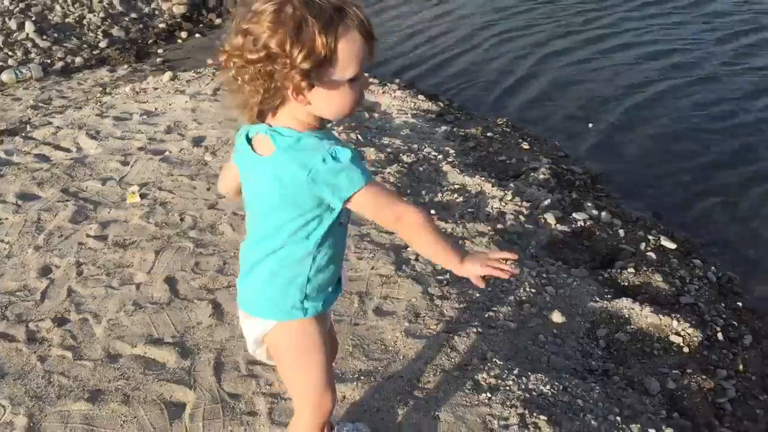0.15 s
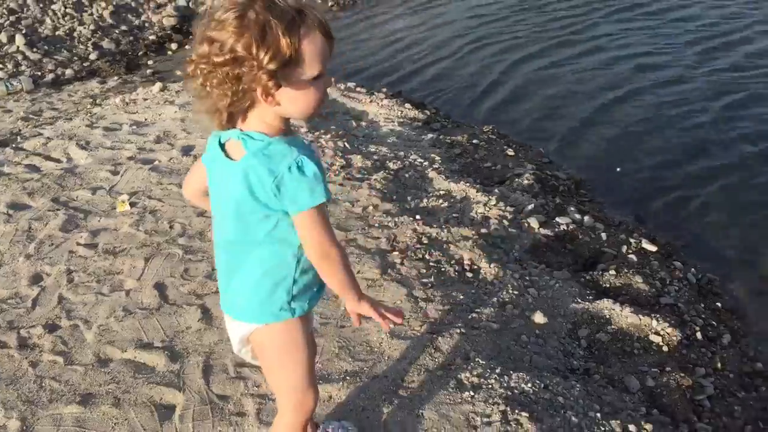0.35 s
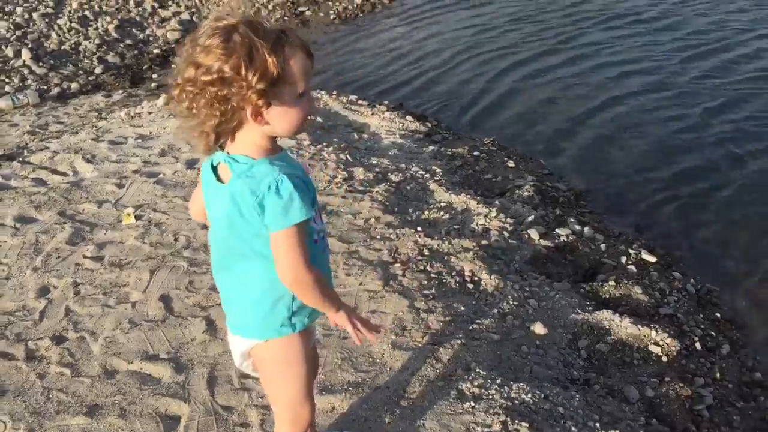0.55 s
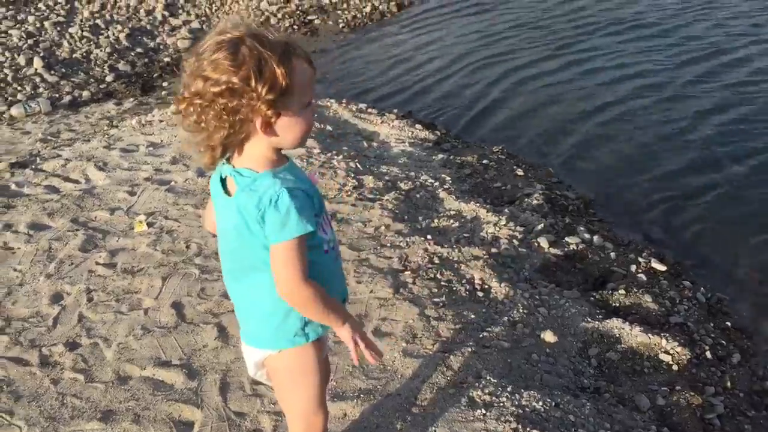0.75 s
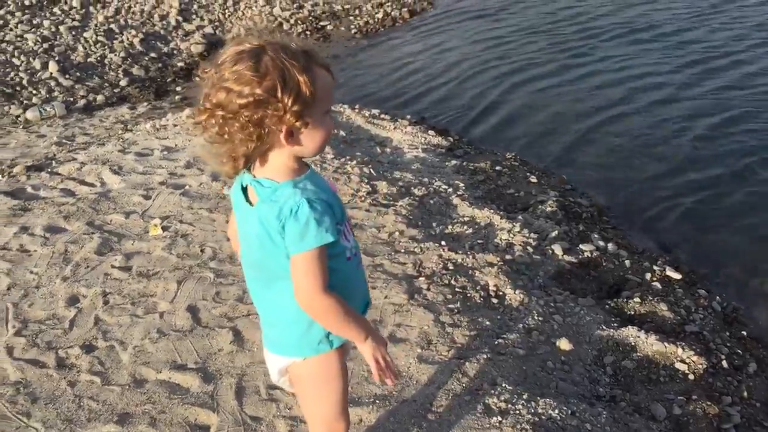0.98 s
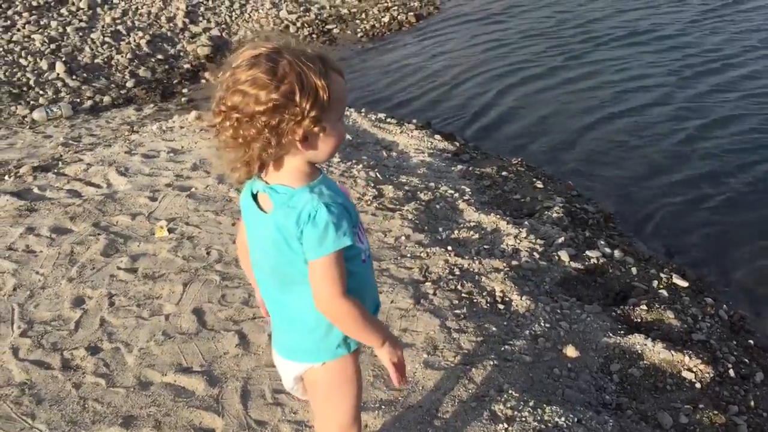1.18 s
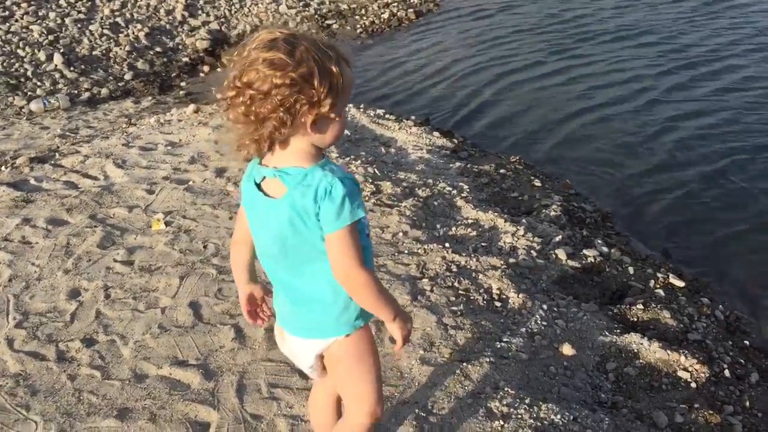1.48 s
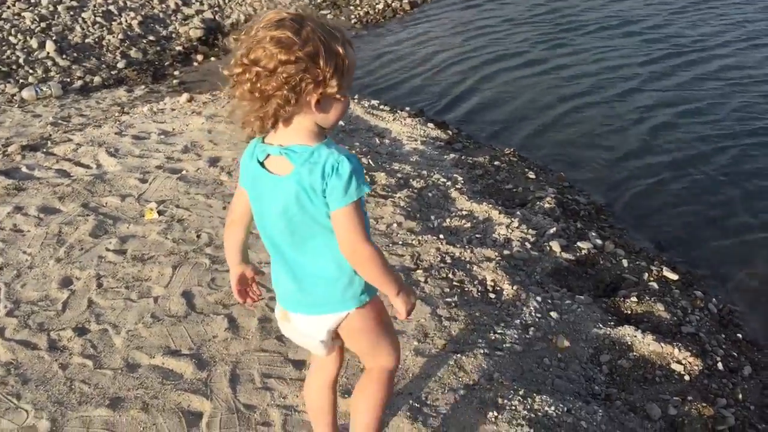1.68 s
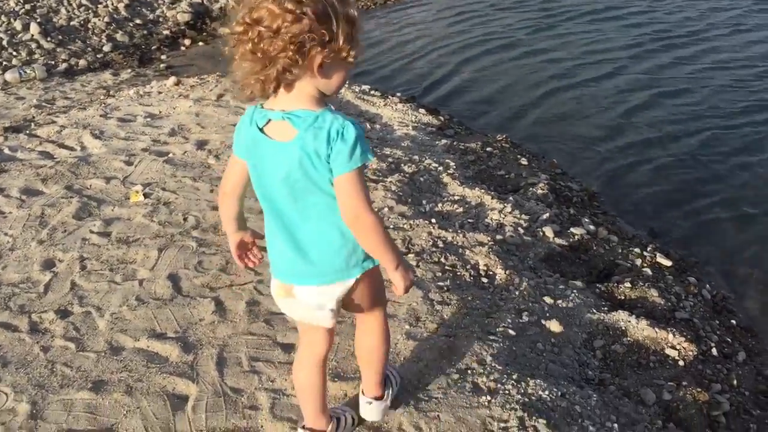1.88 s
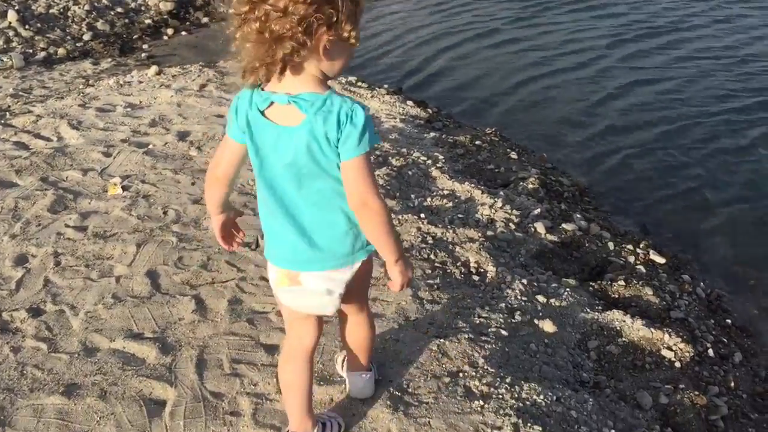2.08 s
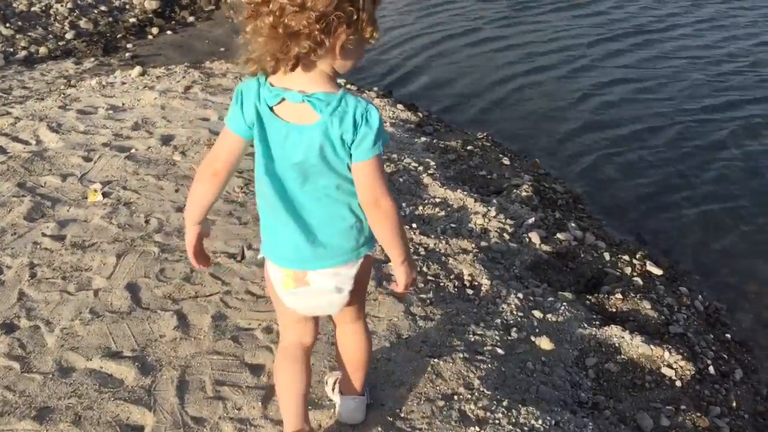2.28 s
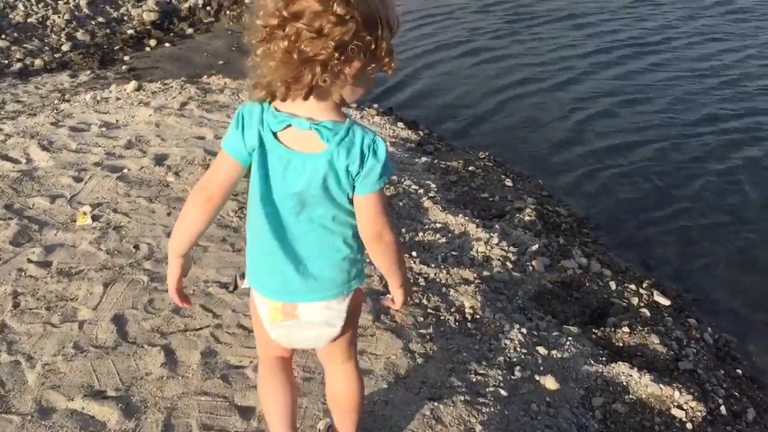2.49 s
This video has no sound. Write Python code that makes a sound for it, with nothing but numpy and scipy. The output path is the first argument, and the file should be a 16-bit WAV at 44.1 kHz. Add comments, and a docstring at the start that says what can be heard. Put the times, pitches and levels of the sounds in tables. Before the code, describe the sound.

Wind buffeting right at a handheld phone microphone: dense heavy thumps first, a brief calmer gap with faint clicks and plips, another uneven cluster of gusts, then weaker puffs over soft lapping water outdoors.

```python
"""Gusty wind is heard first, right at a phone's microphone on a pebbly shore: a wandering low rumble, with
eddies that burst over the port as a thud and a quicker flutter, all shaped noise, and short bright slaps among
them. Behind the wind water washes softly in flickering bands of noise, with a thin wavering sine whine, and a
fine steady hiss lies under everything. Grit ticks and sand slides are bursts and grains of noise; a pebble
knock and water plips are ringing partials. A brief low hoot is a rising sine. The microphone cuts deep bass and
top and rounds the loudest buffets."""
import sys
import numpy as np
from scipy import signal
from scipy.fft import rfft, irfft
from scipy.io import wavfile
from scipy.ndimage import uniform_filter1d

SR = 44100
rng = np.random.default_rng(int(sys.argv[2]) if len(sys.argv) > 2 else 0)


def digitize_waveform(pressure):
    """Quantize a signal to 16-bit integers and store it at the path in sys.argv[1].

    Rows of a 2-D input are taken as channels; values are limited to [-1, 1].
    """
    field = np.atleast_2d(pressure).T
    bounded = np.clip(field, -1, 1)
    quanta = np.round(bounded * 32767).astype(np.int16)
    wavfile.write(sys.argv[1], SR, quanta)


N = 116865

# All levels are those ahead of the microphone's own filters and rounding.
# Low wind rumble between the eddies. Each row: time in seconds, level in dB before RUMBLE_LIFT_DB is added.
RUMBLE_LEVELS = [(0.0, -32.5), (0.21, -25), (0.36, -34), (0.57, -23), (0.74, -34.5), (1.04, -36),
                 (1.3, -55.5), (1.62, -36.5), (1.82, -45), (2.04, -51), (2.21, -34.5), (2.65, -44)]
RUMBLE_LIFT_DB, RUMBLE_TOP_HZ, RUMBLE_SLOPE = 4.5, 114, 3.56

# Water and far air behind the wind. Each row: frequency in Hz, relative spectrum level in dB.
WASH_COLOUR = [(200, 11), (700, 2.5), (1500, -1), (2200, -4.5), (3300, -10), (5000, -21), (9000, -31.5),
               (17000, -37)]
WASH_DB = -49.5
WASH_BAND_OCT, WASH_FLICKER_DB, WASH_FLICKER_PER_S = 0.5, 2, 12

# Steady fine hiss. Each row: frequency in Hz, relative spectrum level in dB.
HISS_COLOUR = [(2000, -18.5), (4000, 4), (8000, -9), (17000, -12)]
HISS_DB = -74.5

WHINE_HZ, WHINE_DB = 3396, -67.5  # middle of a slow waver

# Eddies over the microphone port. Each row: centre in seconds, half length in ms (of the flutter; the thud
# is longer by THUD_STRETCH), thud level in dB, flutter level in dB, flutter corner in Hz.
EDDIES = [(0.028, 46, -26.5, -49, 553), (0.049, 7.7, -38, -58, 503), (0.087, 6.1, -34.5, -28.5, 452),
          (0.124, 15, -28, -51, 570), (0.175, 6.5, -26, -18, 300), (0.204, 3.1, -17, -38, 522),
          (0.223, 3.9, -4.5, -25.5, 634), (0.243, 19.8, -6.5, -8.5, 488), (0.281, 14, -35.5, -17, 630),
          (0.32, 26, -14, -24, 500), (0.352, 19.3, -14.5, -28, 500), (0.374, 2.7, -21, -28.5, 450),
          (0.441, 18, -20.5, -33.5, 657), (0.476, 10, -25.5, -19.5, 320), (0.507, 7.1, -18, -16, 369),
          (0.534, 11, -22, -23.5, 600), (0.582, 19, -27.5, -25, 596), (0.611, 29, -20.5, -20.5, 550),
          (0.636, 45, -16.5, -27.5, 494), (0.664, 4.4, -33.5, -14, 546), (0.701, 10.5, -20, -29, 444),
          (0.74, 13.8, -14, -19.5, 598), (0.778, 11, -25, -26.5, 303), (0.866, 9.7, -11, -11, 481),
          (0.892, 12.2, -11.5, -24, 470), (0.918, 12, -45, -63, 400), (0.961, 9.5, -29, -38.5, 460),
          (1.014, 18, -31.5, -41, 398), (1.057, 12.5, -23.5, -36, 353), (1.111, 10.4, -31, -52, 640),
          (1.15, 25, -36, -66, 680), (1.19, 6.2, -35.5, -46, 724), (1.245, 27.4, -25, -33.5, 490),
          (1.286, 10.4, -17, -26, 322), (1.311, 19.8, -16.5, -20, 381), (1.338, 10.5, -11, -16, 512),
          (1.363, 6, -16, -56, 400), (1.412, 33, -35, -52, 525), (1.497, 6.1, -21.5, -32.5, 305),
          (1.572, 9.9, -31, -31, 440), (1.599, 9.2, -15.5, -28.5, 684), (1.623, 41.5, -21.5, -33.5, 556),
          (1.657, 5.5, -27, -33, 450), (1.681, 15.6, -10, -18, 583), (1.7, 9.5, -14, -16.5, 470),
          (1.722, 7.8, -28, -19.5, 440), (1.757, 18, -18.5, -25.5, 666), (1.78, 7, -23.5, -38, 495),
          (1.811, 8.2, -28.5, -44.5, 520), (1.94, 9.9, -35.5, -49.5, 810), (2.002, 9.1, -25.5, -35, 460),
          (2.022, 20, -24.5, -58, 400), (2.058, 7.7, -22, -32, 466), (2.088, 34, -33.5, -60, 400),
          (2.15, 13, -18.5, -27, 505), (2.193, 17.8, -23, -23.5, 278), (2.223, 17, -43, -58.5, 396),
          (2.273, 4.5, -40.5, -33, 404), (2.3, 9.1, -20, -39.5, 400), (2.323, 19, -23, -41.5, 363),
          (2.379, 22.5, -18.5, -28.5, 370), (2.426, 9.1, -35, -34, 294), (2.475, 8.8, -27.5, -66, 430),
          (2.549, 15, -26.5, -32, 466), (2.59, 35, -51, -68, 400)]
THUD_LOW_HZ, THUD_TOP_HZ, THUD_SLOPE, THUD_STRETCH = 53.7, 189, 3.6, 1.153
FLUTTER_LOW_HZ, FLUTTER_SLOPE, FLUTTER_ROUGH_DB = 194, 2.85, 4
BURST_SIZE = 8192  # samples; the swell peaks halfway
SKIRT = 2.15  # envelope exp(-|t / half|^SKIRT)
EVEN, EVEN_S = 0.66, 0.01  # how far a burst's noise is evened out, and over what time

# Sand slides. Each row: centre in seconds, half length in ms, level in dB before the grains modulate it.
SLIDES = [(0.049, 17, -47.5), (.072, 14.4, -51), (.11, 27, -64), (.18, 18, -66), (.73, 8, -74.5),
          (.802, 4.7, -55), (.835, 23, -66.5), (1.15, 17, -54.5), (1.185, 15, -58.5), (1.225, 8, -55.5),
          (1.495, 11, -63), (1.79, 25, -68), (2.35, 14, -65), (2.446, 14, -59)]
# Colour of sliding sand. Each row: frequency in Hz, relative spectrum level in dB.
SAND_COLOUR = [(800, -15), (1500, -2.5), (2400, 0), (3400, -9), (6750, -9), (9000, -10.5), (17000, -28)]
SAND_GRAINS_PER_S, SAND_GRAIN_S = 860, 0.0023

# Grit ticks. Each row: time in seconds (onset 0.6 ms earlier), level in dB before the decay, centre in Hz.
TICKS = [(0.1049, -55, 6550), (0.133, -52.5, 6300), (0.1965, -56, 5900), (0.796, -44.5, 7500),
         (1.141, -49, 8700), (1.1473, -45, 9400), (1.1572, -68, 8300), (1.1779, -65, 7300),
         (1.1857, -63, 5700), (1.1978, -55, 8000), (1.2073, -49, 4700), (1.224, -42, 13600),
         (1.384, -58, 8130), (1.3957, -65, 6100), (1.4328, -65, 5800), (1.4902, -71, 7400),
         (1.502, -56, 7000), (1.8013, -53.5, 5670), (2.096, -57, 7160), (2.3454, -55, 5660),
         (2.3829, -53.5, 5300), (2.4493, -58, 6600), (2.6173, -52, 4800)]
TICK_T60_S, TICK_WIDTH = 0.0072, 0.39  # width in natural log of frequency

# Sharp slaps inside the eddies. Each row: start in seconds (the peak is one half length later), level in dB,
# treble slope of the filter in steps of 6 dB an octave (a burst then applies half as much again).
SLAPS = [(0.172, -26.5, 4), (0.2, -17, 4), (0.217, -11, 4), (0.223, -8.5, 3.5), (0.244, -9.5, 3.5),
         (0.265, -12, 4), (0.281, -12, 4.5), (0.315, -18, 3.5), (0.341, -29.5, 5), (0.349, -20, 4.2),
         (0.364, -18, 4), (0.423, -26, 5), (0.439, -14.5, 3.5), (0.471, -23.5, 4.5), (0.502, -25, 4.2),
         (0.53, -15, 4), (0.568, -22.5, 4), (0.584, -17, 4.2), (0.6, -19.5, 3.5), (0.632, -23, 4.2),
         (0.657, -23, 3.5), (0.698, -23, 4), (0.726, -23.5, 4.5), (0.741, -19, 4.2), (0.863, -9.5, 4.2),
         (1.334, -11, 4), (1.566, -36, 5), (1.597, -15.5, 4), (1.678, -13, 4), (1.72, -16.5, 5),
         (1.752, -20, 5), (2.148, -26, 3.5), (2.362, -31, 6), (2.545, -45, 4.2)]
SLAP_HALF_MS, SLAP_LOW_HZ, SLAP_TOP_HZ = 2.205, 294, 666

# Partials of the pebble knock. Each row: pitch in Hz, relative level in dB, T60 in seconds.
PEBBLE = [(820, 3, 0.017), (2160, -10, .008), (3880, -7, 0.0106), (5170, -1, 0.011), (5650, -9, .008),
          (8770, -5, 0.0087), (12200, -7, .006), (14800, -8, .006), (15700, -13, .006)]
KNOCK_S, KNOCK_DB, KNOCK_SPREAD_S = 0.7946, -40, 0.0026

# Small water plips and gurgles. Each row: start in seconds, peak in dB, starting pitch in Hz, T60 in seconds.
PLIPS = [(1.075, -42, 1290, 0.0069), (1.108, -39, 1476, .008), (1.132, -39, 1100, 0.0088),
         (1.1468, -31.5, 2060, 0.012), (1.187, -32, 1754, .025), (1.211, -40.5, 1110, 0.043),
         (1.274, -42, 1314, 0.046), (1.389, -47, 1270, 0.012), (1.398, -41, 1200, .01),
         (1.858, -36.5, 790, 0.011)]
PLIP_GLIDE = 0.044  # the mean pitch since the start has risen by this fraction after one T60

# A brief low hoot. Each row: centre in seconds, half length in ms, level in dB, pitch at the centre in Hz.
HOOT = [(1.418, 41, -43, 458.4)]
HOOT_RISE_HZ_PER_S, HOOT_ROUGH_DB = 500, 2

MIC_LOW_HZ, MIC_TOP_HZ, CEILING = 39, 17700, 1.04  # ceiling in linear amplitude


def undb(db):
    """Level in dB to linear gain."""
    return 10 ** (np.asarray(db) / 20)


def unit(x):
    """Scale to an RMS of 1."""
    return x / np.sqrt(np.mean(x ** 2))


def slopes(size, low_hz, top_hz, slope):
    """Gain per bin: steep cut under low_hz, a fall of 6 * slope dB an octave over top_hz."""
    f = np.arange(size // 2 + 1) * SR / size + 1e-3
    return 1 / np.sqrt((1 + (low_hz / f) ** 6) * (1 + (f / top_hz) ** (2 * slope)))


def coloured(points):
    """Noise of RMS 1 with a spectrum drawn through (Hz, dB) points on a log frequency axis."""
    p = np.array(points, float)
    f = np.arange(N // 2 + 1) * SR / N + 1
    gain = undb(np.interp(np.log(f), np.log(p[:, 0]), p[:, 1]))
    return unit(irfft(rfft(rng.standard_normal(N)) * gain, N))


def walk(rate, size=N):
    """Smooth random wander, spread about 1, from noise averaged twice over 1 / rate seconds."""
    k = int(SR / rate)
    noise = rng.standard_normal(size + 4 * k)
    smooth = uniform_filter1d(uniform_filter1d(noise, k), k)[2 * k:2 * k + size]
    return smooth * np.sqrt(1.5 * k)


def add(out, x, start):
    """Mix x into out from sample start."""
    a, b = max(start, 0), min(start + len(x), len(out))
    out[a:b] += x[a - start:b - start]


def burst(half_s, gain, db, rough=1):
    """One swell of turbulent noise, filtered before and after its envelope, whose energy is set by db."""
    t = (np.arange(BURST_SIZE) - BURST_SIZE // 2) / SR
    bell = np.exp(-np.abs(t / half_s) ** SKIRT)
    x = irfft(rfft(rng.standard_normal(BURST_SIZE) * rough) * gain, BURST_SIZE)
    local_power = uniform_filter1d(x ** 2, int(EVEN_S * SR))
    swell = x / local_power ** (EVEN / 2) * bell
    x = irfft(rfft(swell) * np.sqrt(gain), BURST_SIZE)
    return x * undb(db) * np.sqrt(np.sum(bell ** 2) / np.sum(x ** 2))


def ring(hz, t60, glide=0.):
    """A partial that decays exponentially and may rise in pitch."""
    t = np.arange(3000) / SR
    return np.sin(2 * np.pi * hz * t * (1 + glide * t / t60)) * np.exp(-np.log(1000) * t / t60)


def rumble():
    """Wind turbulence at the microphone: low filtered noise whose level follows a curve and wanders."""
    s, db = np.array(RUMBLE_LEVELS).T
    gain = slopes(N, THUD_LOW_HZ, RUMBLE_TOP_HZ, RUMBLE_SLOPE)
    noise = unit(irfft(rfft(rng.standard_normal(N)) * gain, N))
    level = np.interp(np.arange(N) / SR, s, db) + RUMBLE_LIFT_DB
    return noise * undb(level + 0.83 * walk(28))


def wash():
    """Soft water wash behind the wind: noise in overlapping bands that flicker each on their own."""
    bins = rfft(coloured(WASH_COLOUR))
    place = np.log2(np.arange(N // 2 + 1) * SR / N + 1) / WASH_BAND_OCT
    out = np.zeros(N)
    for k in range(12, 30):  # band centres from 64 Hz up
        band = irfft(bins * np.clip(1 - np.abs(place - k), 0, 1), N)
        out += band * undb(WASH_FLICKER_DB * walk(WASH_FLICKER_PER_S))
    return out * undb(WASH_DB)


def hiss():
    """Steady fine hiss: coloured noise at a fixed level."""
    return coloured(HISS_COLOUR) * undb(HISS_DB)


def whine():
    """Thin sine whose pitch wavers by a few Hz and whose level wavers by a few dB."""
    pitch = WHINE_HZ + 1.9 * walk(3.1)
    return np.sin(2 * np.pi * np.cumsum(pitch) / SR) * undb(WHINE_DB + 2.1 * walk(18.7))


def eddies():
    """Each eddy bursts over the port as a long low thud and a shorter, brighter, rougher flutter."""
    out = np.zeros(N)
    thud_gain = slopes(BURST_SIZE, THUD_LOW_HZ, THUD_TOP_HZ, THUD_SLOPE)
    for at, ms, thud_db, flutter_db, hz in EDDIES:
        start = int(at * SR) - BURST_SIZE // 2
        add(out, burst(THUD_STRETCH * ms / 1000, thud_gain, thud_db), start)
        rough = undb(FLUTTER_ROUGH_DB * walk(148, size=BURST_SIZE))
        flutter_gain = slopes(BURST_SIZE, FLUTTER_LOW_HZ, hz, FLUTTER_SLOPE)
        add(out, burst(ms / 1000, flutter_gain, flutter_db, rough), start)
    return out


def sand_slides():
    """Sliding sand: coloured noise in short swells, modulated by random decaying grain impacts."""
    t = np.arange(N) / SR
    swell = sum(undb(db) * np.exp(-np.abs((t - at) * 1000 / ms) ** 2) for at, ms, db in SLIDES)
    impacts = (rng.random(N) < SAND_GRAINS_PER_S / SR) * rng.exponential(1, N)
    grains = unit(signal.lfilter([1], [1, -np.exp(-1 / (SAND_GRAIN_S * SR))], impacts))
    return coloured(SAND_COLOUR) * swell * (0.35 + grains)


def grit_ticks():
    """Each tick of grit is a band of noise with a sudden start and an exponential decay."""
    out = np.zeros(N)
    f = np.arange(513) * SR / 1024 + 1
    decay = np.exp(-np.log(1000) * np.arange(1024) / SR / TICK_T60_S)
    for at, db, hz in TICKS:
        band = np.exp(-(np.log(f / hz) / TICK_WIDTH) ** 2)
        noise = unit(irfft(rfft(rng.standard_normal(1024)) * band))
        add(out, noise * decay * undb(db), int((at - 0.0006) * SR))
    return out


def slaps():
    """Very short, bright pressure kicks at the microphone, each a filtered noise burst."""
    out = np.zeros(N)
    half_s = SLAP_HALF_MS / 1000
    for at, db, fall in SLAPS:
        gain = slopes(BURST_SIZE, SLAP_LOW_HZ, SLAP_TOP_HZ, fall)
        add(out, burst(half_s, gain, db), int((at + half_s) * SR) - BURST_SIZE // 2)
    return out


def pebble_knock():
    """A pebble's ringing partials, excited by a decaying crunch of noise and faded over 10 ms."""
    out = np.zeros(N)
    crunch = rng.standard_normal(400) * np.exp(-np.arange(400) / SR / KNOCK_SPREAD_S)
    body = sum(undb(db) * ring(hz, t60) for hz, db, t60 in PEBBLE)
    knock = unit(np.convolve(body, crunch)[:441])
    add(out, knock * undb(KNOCK_DB) * np.hanning(882)[441:], int(KNOCK_S * SR))
    return out


def water_plips():
    """Each plip or gurgle of water is one decaying sine that rises a little in pitch."""
    out = np.zeros(N)
    for at, db, hz, t60 in PLIPS:
        add(out, undb(db) * ring(hz, t60, PLIP_GLIDE), int(at * SR))
    return out


def low_hoot():
    """A sine that rises in pitch under a flat-topped swell, unsteady in pitch and level."""
    t = np.arange(N) / SR
    out = np.zeros(N)
    for at, ms, db, hz in HOOT:
        pitch = hz + HOOT_RISE_HZ_PER_S * np.clip(t - at, -0.1, 0.1) + 20 * walk(65)
        swell = np.exp(-((t - at) * 1000 / ms) ** 4)
        out += np.sin(2 * np.pi * np.cumsum(pitch) / SR) * undb(db + HOOT_ROUGH_DB * walk(72)) * swell
    return out


def scene():
    """Wind close on the microphone, the shore behind it, and the small sounds of sand, stone and water."""
    wind = rumble() + eddies() + slaps()
    shore = wash() + hiss() + whine() + low_hoot()
    ground = sand_slides() + grit_ticks() + pebble_knock() + water_plips()
    return (wind + shore + ground)[None]


def record(dry):
    """The microphone: deep bass is cut, the loudest buffets are rounded by tanh, the top is cut."""
    bass_cut = signal.butter(3, MIC_LOW_HZ, "high", fs=SR, output="sos")
    top_cut = signal.ellip(8, 0.2, 40, MIC_TOP_HZ, fs=SR, output="sos")
    rounded = CEILING * np.tanh(signal.sosfilt(bass_cut, dry) / CEILING)
    return signal.sosfilt(top_cut, rounded)


dry = scene()
out = record(dry)
digitize_waveform(out)
```